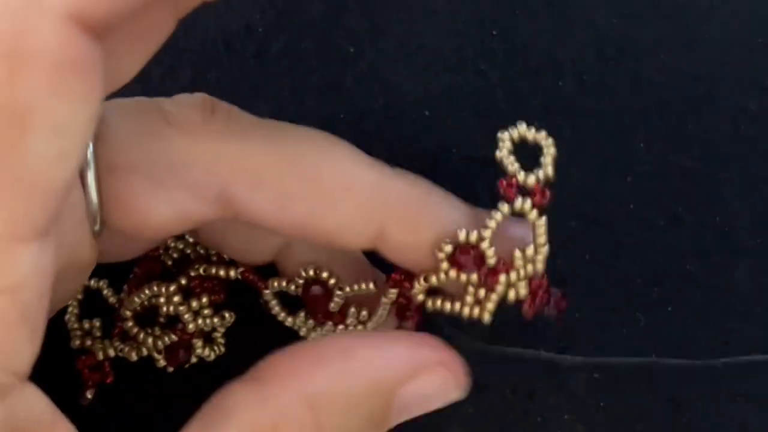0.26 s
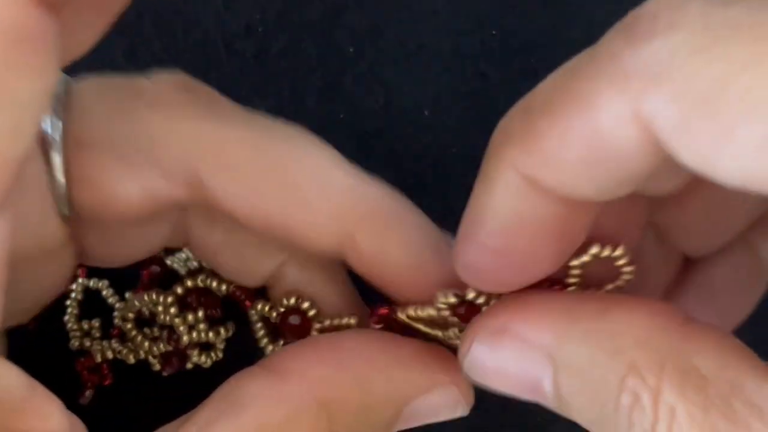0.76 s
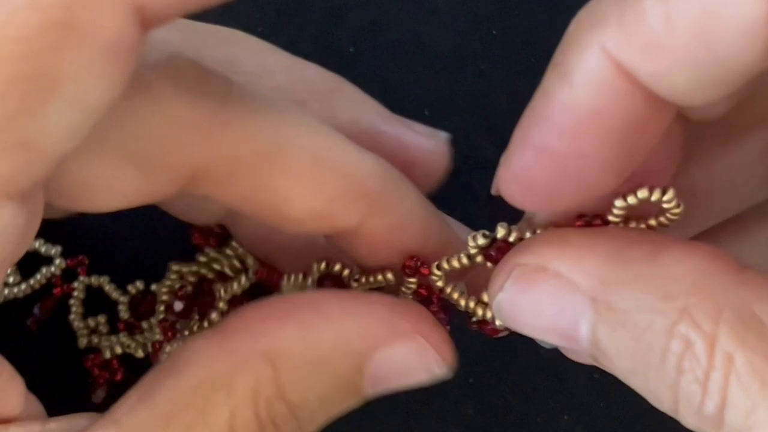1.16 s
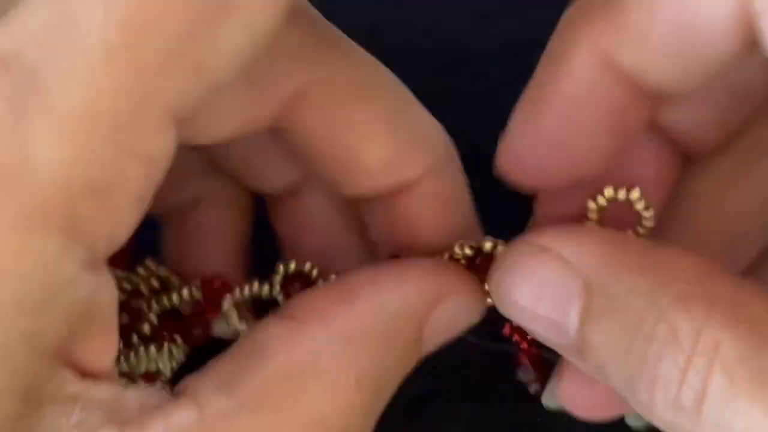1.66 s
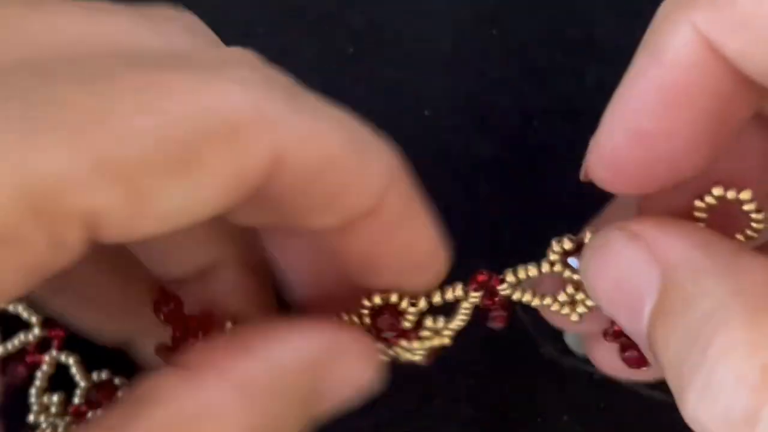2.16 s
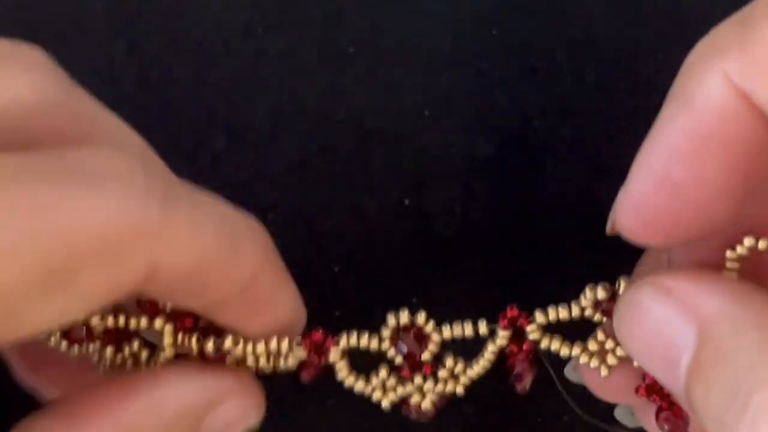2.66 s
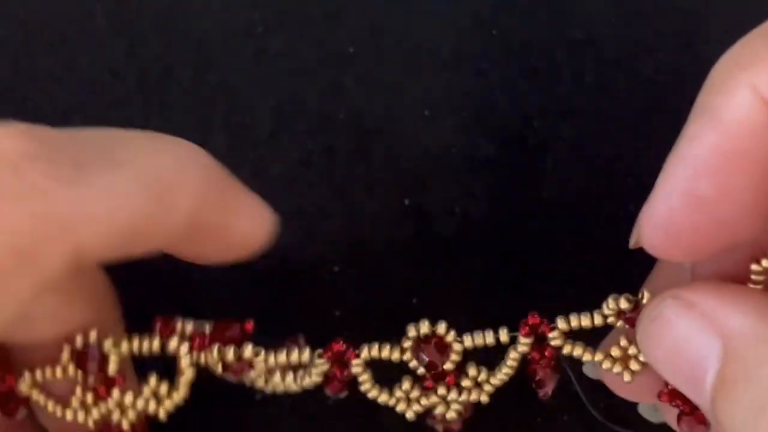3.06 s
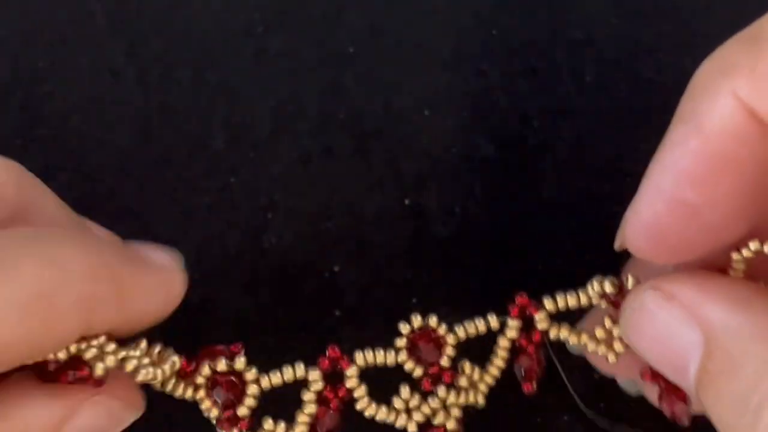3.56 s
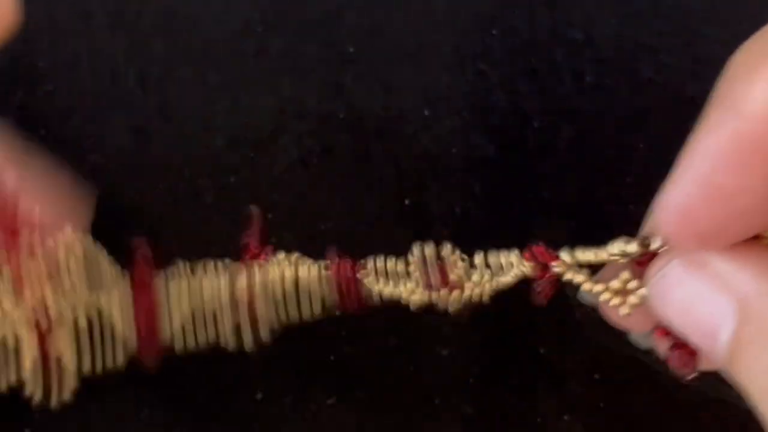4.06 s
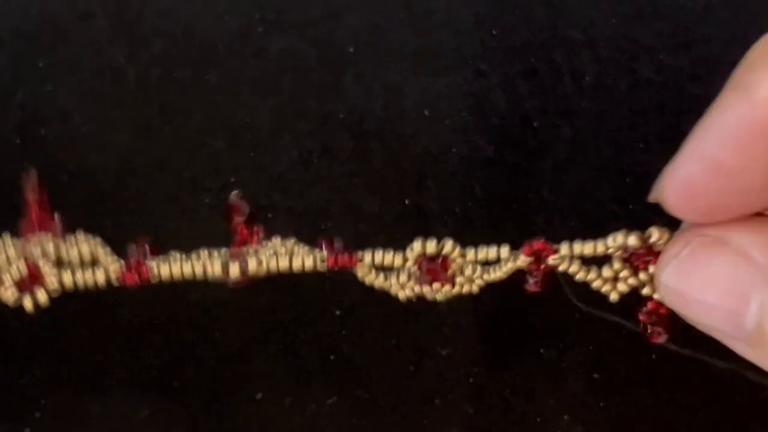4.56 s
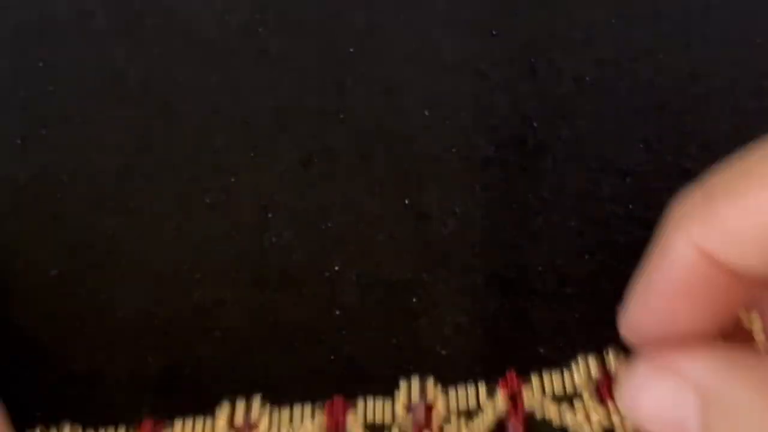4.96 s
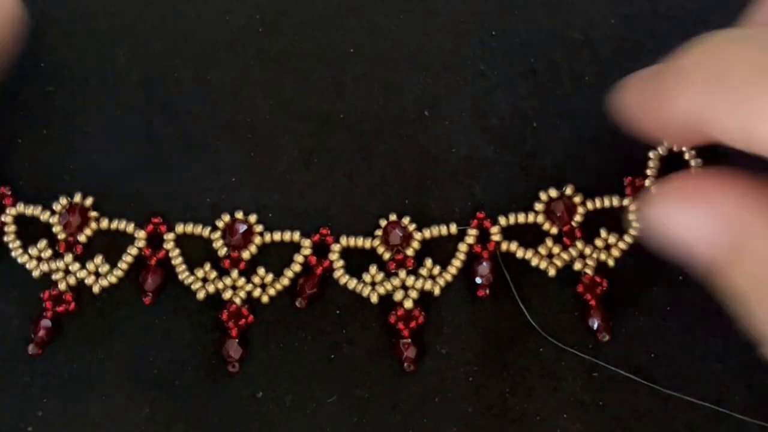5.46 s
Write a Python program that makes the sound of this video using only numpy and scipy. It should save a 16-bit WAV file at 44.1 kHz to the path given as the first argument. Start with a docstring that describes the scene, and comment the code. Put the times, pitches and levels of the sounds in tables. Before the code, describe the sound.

Over a quiet steady hum, small glass beads tick, rattle briefly and drag across cloth as hands work a necklace very close.

```python
"""A small room, with hands close to a two-port microphone turning a necklace of glass seed beads.
Knocks are noise-edged impulses through a short bead ring; rustles, and the drag over a cloth, are swarms of
tiny contacts through similar rings. Sparse, quickly dying echoes answer both.
In the background two motors hum as sums of sines, one steady and one ending slower than it began,
over shaped noise for moving air and hiss. A low noise bump marks the second hand taking hold."""
import sys
import numpy as np
from scipy import signal
from scipy.fft import rfft, irfft
from scipy.io import wavfile
from scipy.ndimage import uniform_filter1d

SR = 44100
rng = np.random.default_rng(int(sys.argv[2]) if len(sys.argv) > 2 else 0)


def dump_mix(stems):
    """Bounce the given channels to the path in sys.argv[1] as a 16-bit WAV at rate SR."""
    frames = np.atleast_2d(stems).T  # one column per channel
    limited = np.clip(frames, -1, 1)  # hard clip at full scale
    pcm = np.round(limited * 32767).astype(np.int16)
    wavfile.write(sys.argv[1], SR, pcm)


N = 250929
TIME = np.arange(N) / SR

# beads knocking together:
# (time [s], level before the snap's own gain [dB], extra treble [dB], ring [Hz])
CLICKS = [(2.4338, -53, -23, 3280), (2.4985, -48, -40, 4100), (2.5617, -52, -38, 3650),
          (2.6449, -51.5, -11, 3870), (2.7355, -41, -11, 3700), (2.829, -53.5, -6, 3750),
          (2.917, -62, -7, 3650), (2.9447, -42, 6, 3690), (3.0387, -61.5, -3, 3600),
          (3.182, -46.5, 9.5, 3650), (3.193, -37.5, 2, 3580), (3.368, -45, 1, 3420),
          (3.3919, -30.5, -5.5, 3830), (3.443, -49, -13, 4280), (3.655, -38.5, -5.5, 3800),
          (3.6785, -28.5, 0.5, 3650), (3.7214, -33, -4, 3450), (3.7263, -25.5, -3, 3470),
          (3.8987, -54, -5, 3650), (3.9238, -42, -5.5, 3330), (4.1407, -44, -12, 3500),
          (5.0396, -47.5, 7.5, 3450), (5.0528, -29.5, 3.5, 3790), (5.082, -32.5, -12, 4140),
          (5.156, -56, -3, 3900), (5.372, -35.5, -15, 3750), (5.4042, -23.5, -6.5, 3900),
          (5.4153, -35, 9.5, 3700)]
TYPICAL_RING_HZ = 3650  # the ring for which both contact colours are given


def gain_of(db):
    """Decibels to amplitude."""
    return 10 ** (np.asarray(db) / 20)


def evened(x):
    """Scales to rms 1."""
    return x / np.sqrt(np.mean(x ** 2) + 1e-20)


def read(points, hz):
    """Reads a table on a log-frequency axis."""
    f, value = np.transpose(points)
    return np.interp(np.log(hz + 1), np.log(f + 1), value)


def add(mix, s, sound):
    """Mixes a sound in at time s."""
    part = mix[max(round(s * SR), 0):][:len(sound)]
    part += sound[:len(part)]


def wander(rate):
    """Random drift of rms 1: noise whose spectrum falls steeply above rate [Hz]."""
    f = np.fft.rfftfreq(N, 1 / SR)
    return evened(irfft(rfft(rng.standard_normal(N)) / (1 + (f / rate) ** 4), N))


def partial(turns, db, waver_db):
    """One motor line: a sine following the turns, wavering slightly in level and phase."""
    phase_drift = waver_db * np.log(10) / 20 * wander(0.67)
    level = gain_of(db + waver_db * wander(1.6))
    return np.sqrt(2) * level * np.sin(2 * np.pi * (turns + rng.random()) + phase_drift)


def hum():
    """Two motors as multiples of their speeds; the slowing one slides off a room resonance, so its boom fades."""
    steady_hz = 54.83
    # steady motor: (multiple of its speed, level [dB])
    steady_orders = [(1, -48), (6, -65), (7, -69.5)]
    # speed of the slowing motor: (time [s], speed [Hz])
    slowing_speed = [(0, 83), (1, 83.5), (3, 82.5), (5.7, 82)]
    # slowing motor without its boom: (multiple of its speed, level [dB])
    slowing_orders = [(1, -55.5), (1.5, -67), (2.251, -68), (3, -63), (3.75, -73.5)]
    # booming second partial of the slowing motor: (time [s], level [dB])
    boom_levels = [(0, -51), (1, -52.5), (2.5, -56.5), (4, -62), (5.7, -64.5)]

    turns = np.cumsum(np.interp(TIME, *np.transpose(slowing_speed))) / SR
    steady = sum(partial(k * steady_hz * TIME, db, waver_db=.3) for k, db in steady_orders)
    slowing = sum(partial(k * turns, db, waver_db=.7) for k, db in slowing_orders)
    boom = partial(2 * turns, np.interp(TIME, *np.transpose(boom_levels)), waver_db=.3)
    return steady + slowing + boom


def air(air_db=-61):
    """Low rush of moving air under a faint hiss: shaped noise, partly alike at both ports."""
    # room air and microphone hiss: (frequency [Hz], relative density [dB])
    air_colour = [(20, -28), (45, 2), (70, 5), (110, -0.5), (200, -4), (260, 0), (340, -5.5), (430, -16),
                  (600, -20.5), (1000, -28), (2200, -38.5), (5000, -41.5), (7800, -39), (11000, -48),
                  (15000, -51.5)]
    # how alike the two ports are: (frequency [Hz], left-right likeness [0 to 1])
    air_likeness = [(60, 1.0), (290, 0.87), (640, 0.14), (1400, 0.12), (3000, 0.89), (8000, 0.95),
                    (15000, 0.34)]

    hz = np.fft.rfftfreq(N, 1 / SR)
    left, other = rfft(rng.standard_normal((2, N)))
    same = np.clip(read(air_likeness, hz), -1, 1)
    right = same * left + np.sqrt(1 - same ** 2) * other
    rush = irfft(np.array([left, right]) * gain_of(read(air_colour, hz)), N)
    return gain_of(air_db) * evened(rush)


def finger_bump(db=-54):
    """A soft low bump as the second hand takes hold: a swell of band-limited noise."""
    middle_s, length_s = .465, .08
    out, size = np.zeros(N), int(length_s * SR)
    band = signal.butter(3, [55, 135], "bandpass", fs=SR, output="sos")
    push = signal.sosfilt(band, rng.standard_normal(SR))
    add(out, middle_s - length_s / 2, gain_of(db) * evened(push[-size:] * np.hanning(size)))
    return out


def contact(colour, treble_db, ring_hz, ring_db, uneven_db, ring_width_hz=260, shelf_hz=6200, size=1024):
    """The brief ring of one contact; a heavier clump of beads rings lower, and its whole colour sinks with it."""
    hz = np.fft.rfftfreq(size, 1 / SR)
    bumps = evened(uniform_filter1d(rng.standard_normal(len(hz)), size=11))
    ring = 1 / (1 + ((hz - ring_hz) / ring_width_hz) ** 2)
    colour_db = read(colour, hz * TYPICAL_RING_HZ / ring_hz)
    gain = evened(gain_of(colour_db + uneven_db * bumps + ring_db * ring))
    gain = gain * gain_of(treble_db * hz ** 6 / (hz ** 6 + shelf_hz ** 6))
    # minimum phase: sharp start, short ring
    log_gain = np.log(np.r_[gain, gain[-2:0:-1]])
    return np.fft.ifft(np.exp(np.conj(signal.hilbert(log_gain)))).real


def slide(levels, treble_db, ring_hz, slips, least_per_s=210, uneven_db=4.5, ring_db=1, count=4):
    """A swarm of tiny contacts on a few beads, bunched by stick and slip; now and then one bead catches."""
    # colour of sliding beads at the typical ring: (frequency [Hz], relative level [dB])
    rub_colour = [(200, -42.5), (600, -18.5), (1000, -11.5), (1800, -5), (2300, -13), (3000, 5),
                  (3900, 0.5), (5000, -5.5), (6500, -8), (9000, -17.5), (12000, -18), (16000, -31)]
    rise_s, fall_s, margin_s = 0.0025, 0.003, .04  # soft edges, and the space left around them
    light_db, firm_db, firm_per_s = -73.5, -51, 3500  # contacts thicken from least_per_s to firm_per_s
    spread_db = 4.2  # scatter of contact strength
    catches_per_s, catch_db, catch_s = 55, 3.5, .002  # catch_s sets the weight of each one-sample tick
    ring_spread = .04  # beads differ in ring by up to this share

    start, end = levels[0][0], levels[-1][0]
    t = TIME[(TIME > start - margin_s) & (TIME < end + margin_s)]
    level_db = np.interp(t, *np.transpose(levels))
    swell = (1 + np.tanh((t - start) / (2 * rise_s))) / 2
    release = (1 + np.tanh((end - t) / (2 * fall_s))) / 2
    pressure = swell * release

    per_s = np.exp(np.interp(level_db, [light_db, firm_db], np.log([least_per_s, firm_per_s])))
    chance, weight, catch = rng.random((3, count, SR))[:, :, :len(t)]
    strengths = gain_of(spread_db * np.minimum(-np.log(weight), 4))
    # fewer contacts are each stronger, so density leaves the level alone
    swarm = strengths * (chance < per_s / count / SR) / np.sqrt(per_s)
    rustle = evened(swarm * np.interp(t, TIME, slips)) / np.sqrt(count)
    catches = gain_of(catch_db) * (catch < catches_per_s / count / SR) * np.sqrt(catch_s * SR)
    force = (rustle + catches) * pressure * gain_of(level_db)

    rings = ring_hz * (1 + ring_spread * (2 * rng.random(count) - 1))
    beads = [signal.fftconvolve(bead, contact(rub_colour, treble_db, hz, ring_db, uneven_db))
             for bead, hz in zip(force, rings)]
    return t[0], sum(beads)


def rubs():
    """Three long slides, short shuffles of the beads, the brighter brush of skin, and the shiver after each click."""
    # fingertips brushing over the beads: (start [s], end [s], level [dB])
    brushes = [(0.439, 0.508, -79), (1.939, 1.971, -78.5), (2.863, 2.929, -77), (4.218, 4.273, -83),
               (4.392, 4.469, -81)]
    # the necklace runs through the fingers: (time [s], level [dB])
    pull = [(2.07, -76.5), (2.102, -58.5), (2.142, -54.5), (2.174, -70), (2.218, -56.5), (2.394, -53.5),
            (2.408, -71.5), (2.474, -72.5), (2.496, -53), (2.556, -73), (2.564, -66), (2.62, -87)]
    # beads shifting against each other: (start [s], end [s], level [dB])
    shuffles = [(2.643, 2.667, -65), (2.803, 2.842, -75), (3.048, 3.092, -76.5), (3.175, 3.189, -58),
                (3.851, 3.913, -67.5), (3.961, 4.011, -56.5), (4.097, 4.128, -57), (4.193, 4.2, -55.5)]
    # the necklace is shaken straight: (time [s], level [dB])
    flick = [(3.705, -62.5), (3.728, -43.5), (3.78, -61.5), (3.83, -74)]
    # the necklace is dragged over the cloth: (time [s], level [dB])
    drag = [(5.06, -56), (5.082, -46.5), (5.096, -66), (5.128, -50.5), (5.164, -60.5), (5.176, -44.5),
            (5.226, -58), (5.264, -42.5), (5.364, -52), (5.372, -45.5), (5.39, -51)]
    brush_per_s = 3700  # skin touches densely however light the stroke
    shiver_db, shiver_s, shiver_treble_db = -34, 0.057, 2.5  # level is relative to the click's table level

    out, slips = np.zeros(N), gain_of(1.3 * wander(160))
    add(out, *slide(pull, treble_db=-5, ring_hz=3720, slips=slips, count=6))
    add(out, *slide(flick, treble_db=5, ring_hz=3450, slips=slips, count=6))
    add(out, *slide(drag, treble_db=2, ring_hz=3660, slips=slips, count=6))
    for start, end, db in shuffles:
        add(out, *slide([(start, db), (end, db)], treble_db=-3.5, ring_hz=3580, slips=slips))
    for start, end, db in brushes:
        stroke = [(start, db), (end, db)]
        add(out, *slide(stroke, treble_db=13.5, ring_hz=3900, slips=slips, least_per_s=brush_per_s))
    # the neighbours shiver after each click
    for s, db, _, ring_hz in CLICKS:
        shiver = [(s, db + shiver_db), (s + shiver_s, db + shiver_db)]
        add(out, *slide(shiver, shiver_treble_db, ring_hz, slips, ring_db=-2.0))
    return out


def room(x, room_db=-9, first_s=0.0044, taps_per_s=4000):
    """Sparse reflections of a small room, partly different at each port, the treble dying first."""
    # time to fall by 60 dB: (frequency [Hz], time [s])
    room_t60 = [(500, 0.17), (3500, 0.093), (8000, 0.079), (15000, 0.077)]

    size = SR // 2
    sparse = rng.standard_normal((3, size)) * (rng.random((3, size)) < taps_per_s / SR)
    taps = sparse * (TIME[:size] > first_s)
    # a shared set of reflections plus one set for each port
    hz, t, z = signal.stft(taps[0] + .9 * taps[1:], SR, nperseg=256)
    decay = gain_of(-60 * t / read(room_t60, hz)[:, None])
    tail = signal.istft(z * decay, SR, nperseg=256)[1]
    return gain_of(room_db) * signal.fftconvolve(x[None], tail / np.linalg.norm(tail[0]), axes=1)[:, :N]


def snap(db, treble_db, ring_hz, click_db=17, uneven_db=-0.16, ring_db=2, chatter_db=-7,
         slip_s=0.0011, settle_s=0.0026, size=300):
    """A bead slips for an instant, snaps against its neighbour, and chatters as it settles: (lead-in [s], sound)."""
    # colour of one bead contact at the typical ring: (frequency [Hz], relative level [dB])
    click_colour = [(200, -42.5), (600, -22), (1000, -16), (1800, -8), (2300, -17), (3000, 2.5), (3900, 1),
                    (5000, -6), (6500, -2), (9000, -14), (12000, -13), (16000, -22)]

    t = np.arange(-size, size) / SR
    chatter = rng.standard_normal(len(t)) * np.exp(-abs(t) / np.where(t < 0, slip_s, settle_s))
    force = gain_of(chatter_db) * chatter / np.linalg.norm(chatter) + (t == 0)
    ring = contact(click_colour, treble_db, ring_hz, ring_db, uneven_db)
    return -t[0], gain_of(click_db + db) * np.convolve(force, ring)


def clicks(lead_s=.0002):
    """Every knock snaps once; the hardest bounce and snap again."""
    hard_db = -26.5  # a click above this table level bounces once
    bounce_s, bounce_db = 0.0027, -4.5  # delay, and level relative to the first snap
    out = np.zeros(N)
    bounces = [(s + bounce_s, db + bounce_db, treble_db, ring_hz)
               for s, db, treble_db, ring_hz in CLICKS if db > hard_db]
    for s, db, treble_db, ring_hz in CLICKS + bounces:
        lead_in_s, click = snap(db, treble_db, ring_hz)
        add(out, s - lead_s - lead_in_s, click)
    return out


def scene():
    """Beads near the microphone, their room, and the background."""
    knocks, rustle = clicks(), rubs()
    near = knocks + rustle
    echoes = room(knocks, room_db=-14.0) + room(rustle, room_db=-8)
    return near + echoes + finger_bump() + hum() + air()


def record(dry):
    """The two channels differ in phase across the spectrum; then the band limit."""
    # phase between the channels: (frequency [Hz], lead of the left channel [rad])
    channel_phase = [(0, 0), (600, -0.6), (1980, 0.1), (2760, 2.5), (3620, 0.9), (4390, 0.6), (5680, 3.0),
                     (6200, 3.3), (8700, 6.2), (9560, 6.6), (11800, 9.2), (13400, 9.9), (14600, 12.1),
                     (16500, 12.8)]
    edge_hz = 16100

    hz = np.fft.rfftfreq(N, 1 / SR)
    lead = np.interp(hz, *np.transpose(channel_phase))
    soft_ends = signal.windows.tukey(N, .002)
    # each channel takes half of the phase difference
    channels = irfft(rfft(dry * soft_ends) * np.exp(.5j * np.array([lead, -lead])), N)
    low_pass = signal.firwin(255, edge_hz, window=("kaiser", 9), fs=SR)
    return signal.oaconvolve(channels, low_pass[None], "same")


dry = scene()
out = record(dry)
dump_mix(out)
```